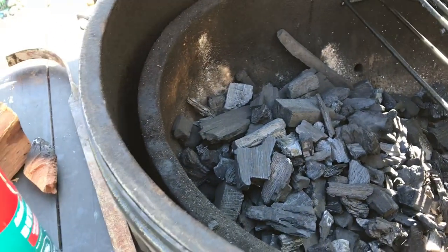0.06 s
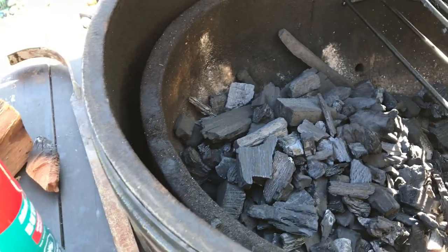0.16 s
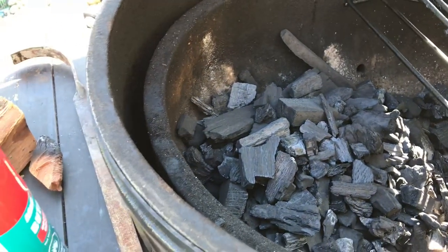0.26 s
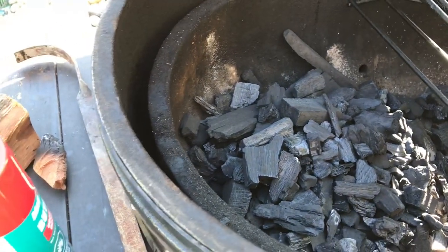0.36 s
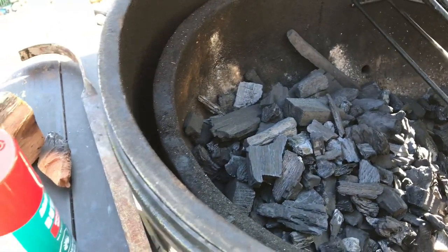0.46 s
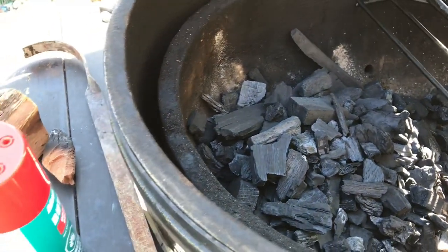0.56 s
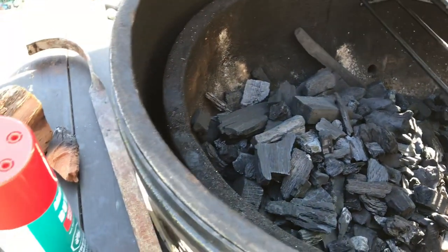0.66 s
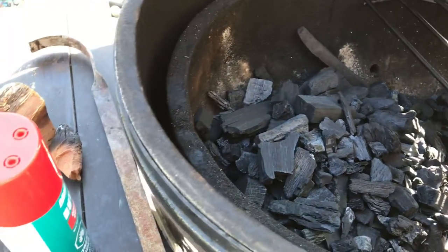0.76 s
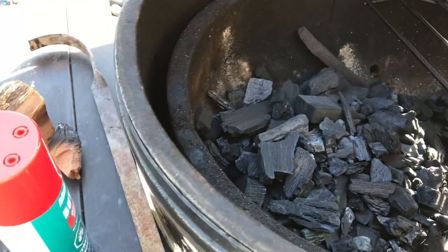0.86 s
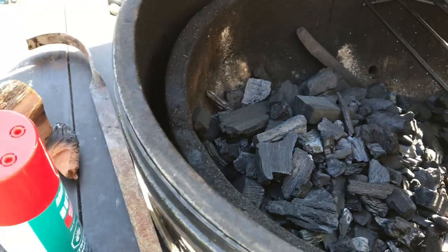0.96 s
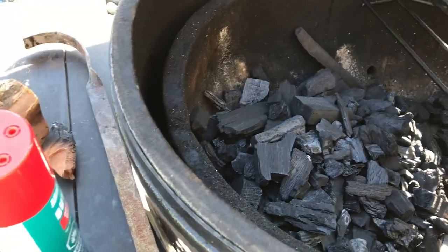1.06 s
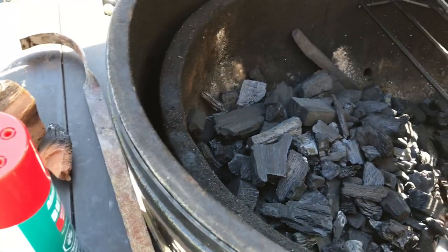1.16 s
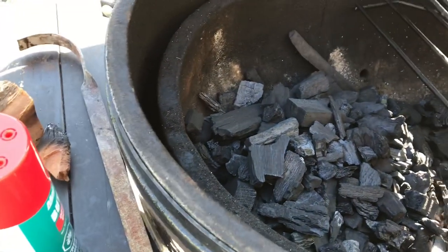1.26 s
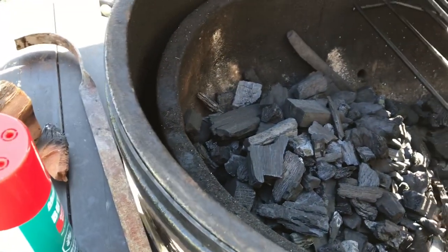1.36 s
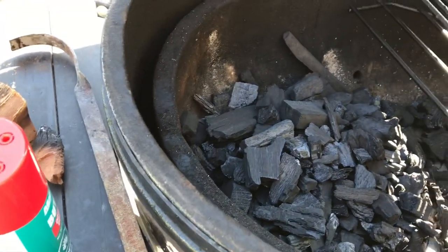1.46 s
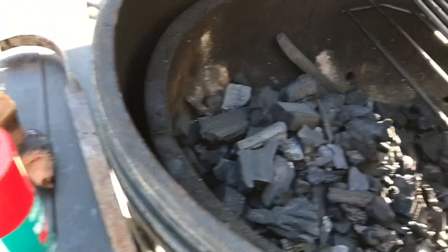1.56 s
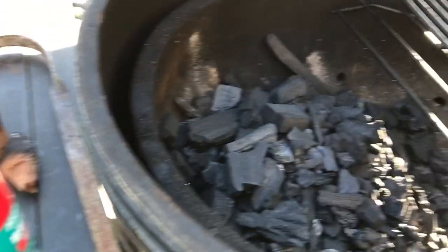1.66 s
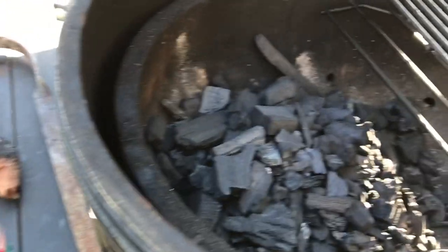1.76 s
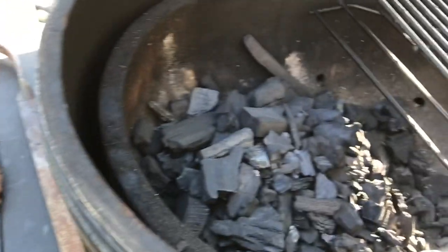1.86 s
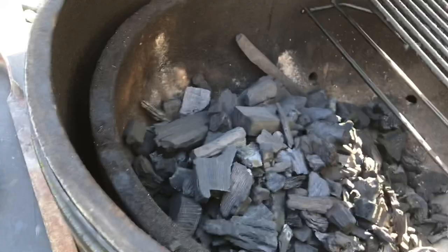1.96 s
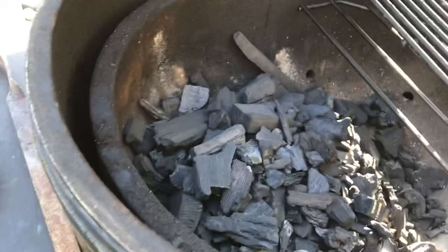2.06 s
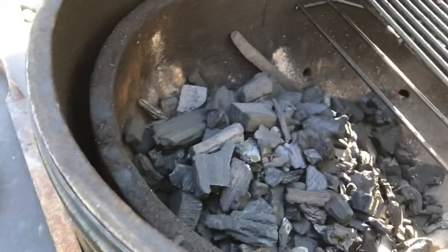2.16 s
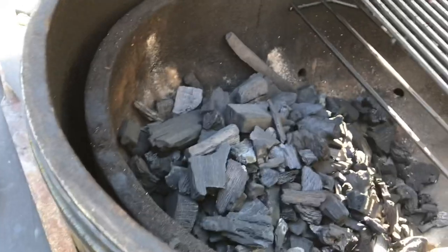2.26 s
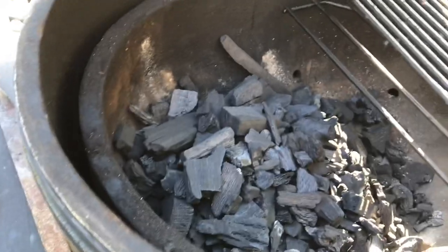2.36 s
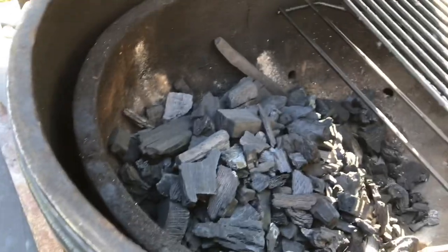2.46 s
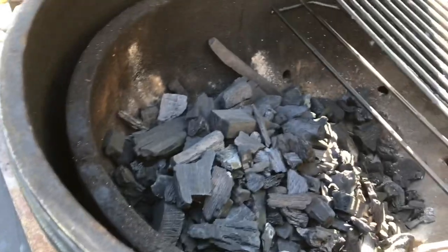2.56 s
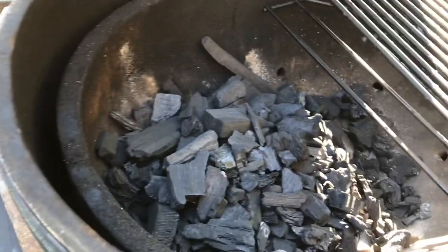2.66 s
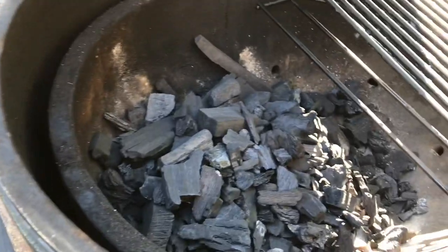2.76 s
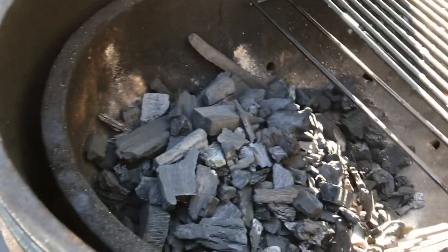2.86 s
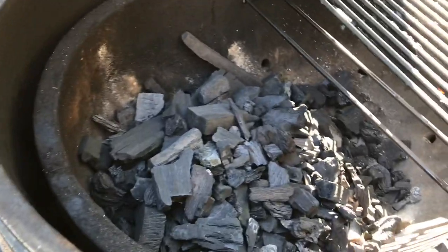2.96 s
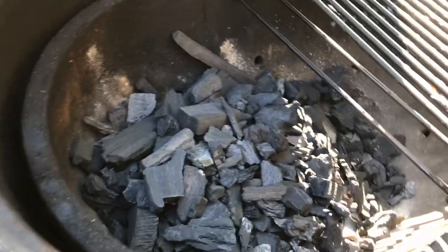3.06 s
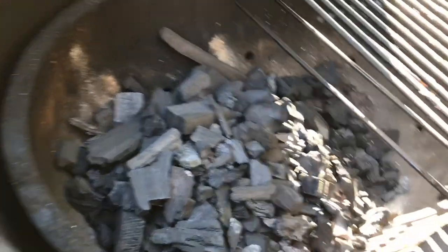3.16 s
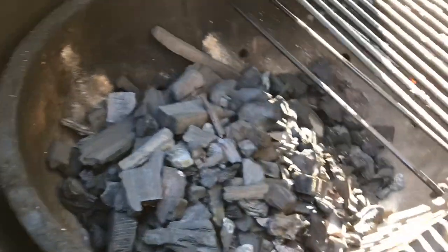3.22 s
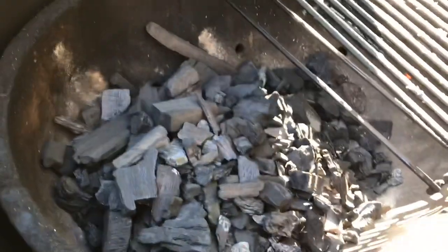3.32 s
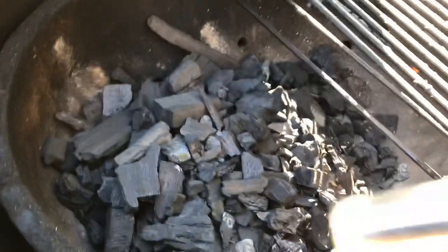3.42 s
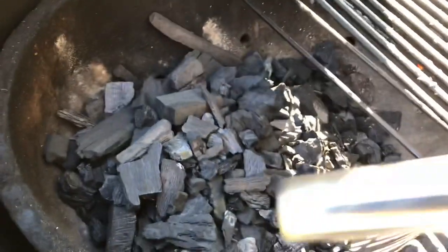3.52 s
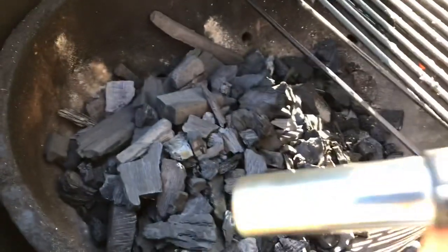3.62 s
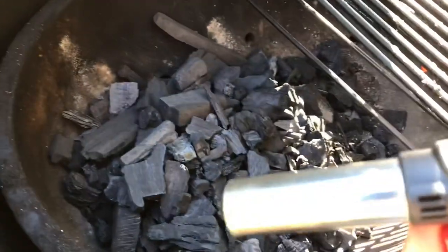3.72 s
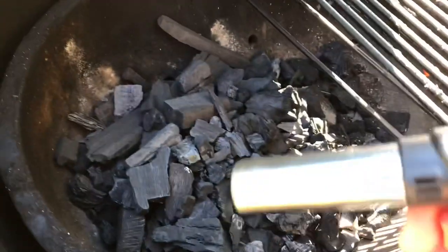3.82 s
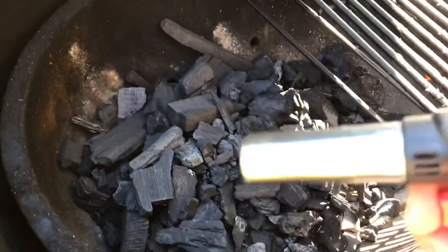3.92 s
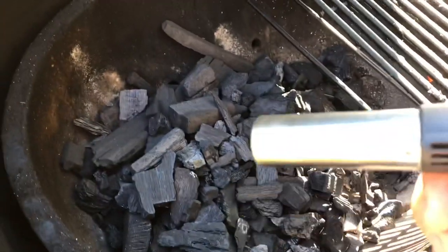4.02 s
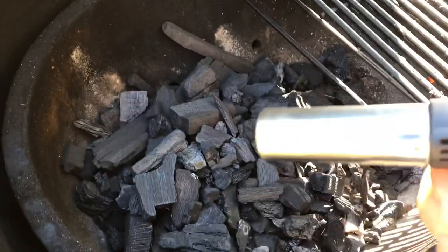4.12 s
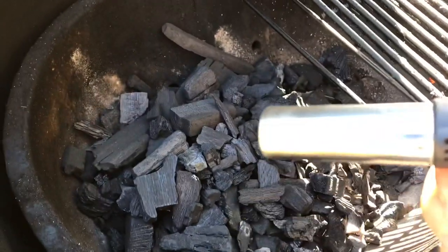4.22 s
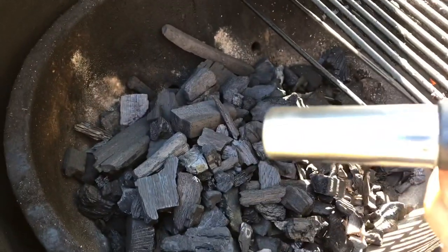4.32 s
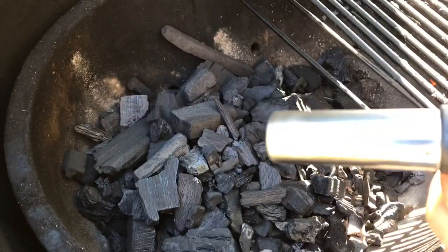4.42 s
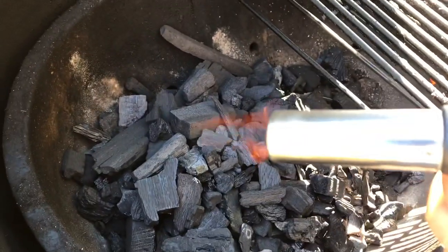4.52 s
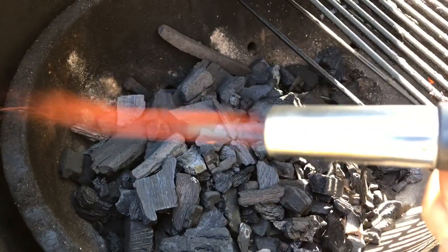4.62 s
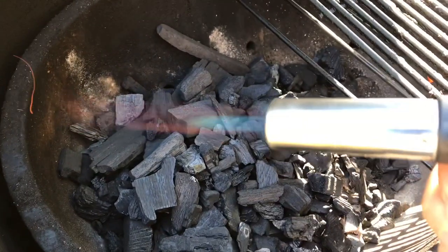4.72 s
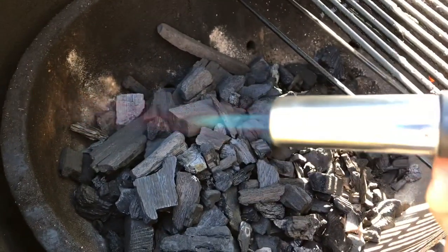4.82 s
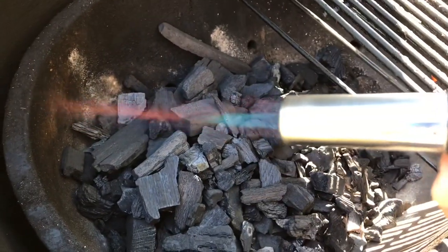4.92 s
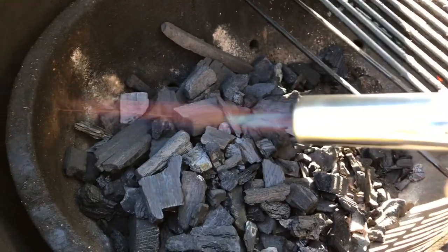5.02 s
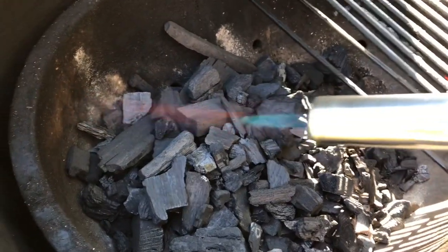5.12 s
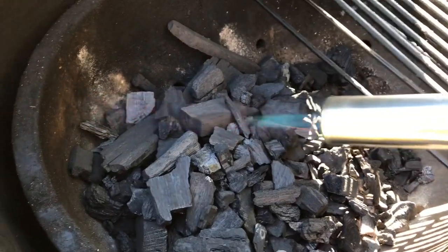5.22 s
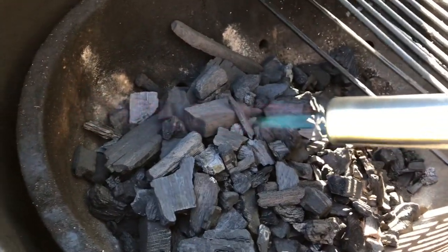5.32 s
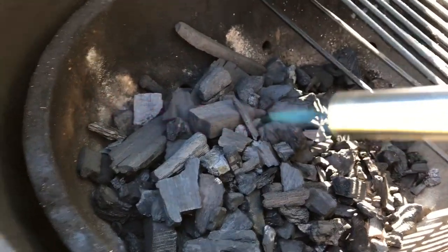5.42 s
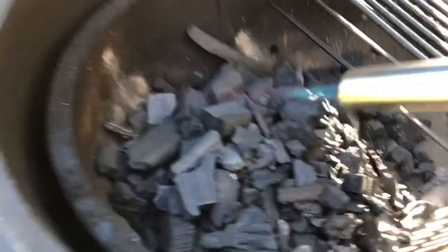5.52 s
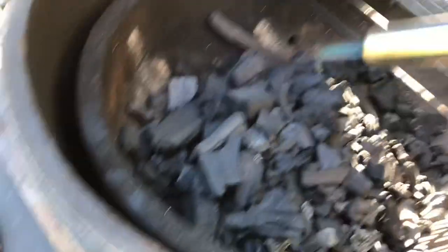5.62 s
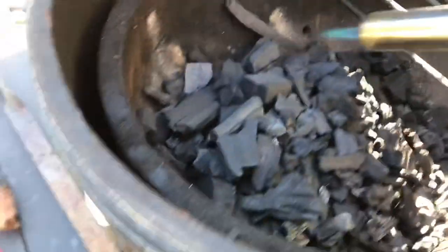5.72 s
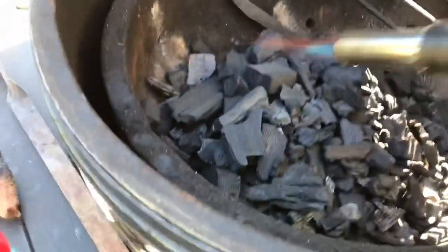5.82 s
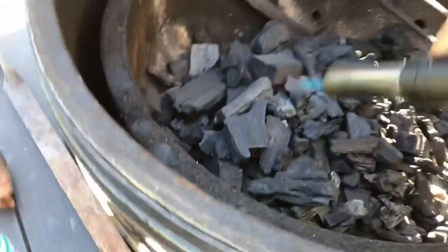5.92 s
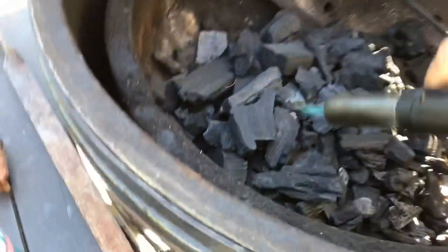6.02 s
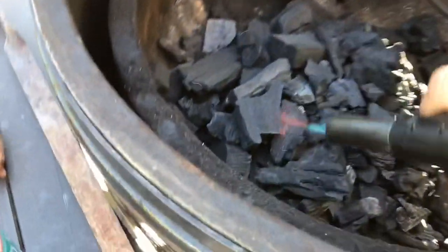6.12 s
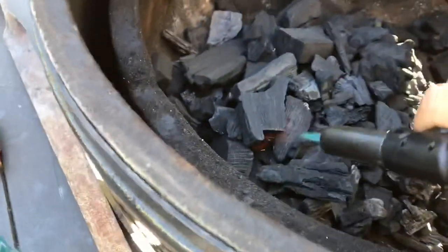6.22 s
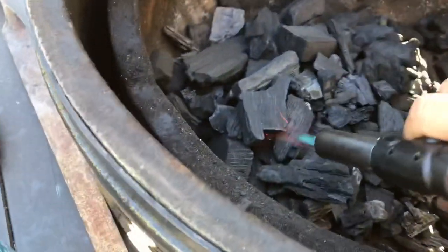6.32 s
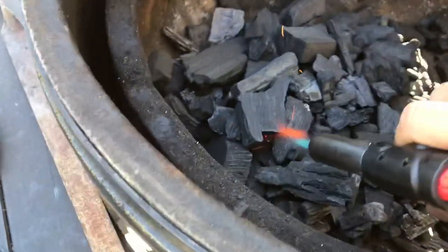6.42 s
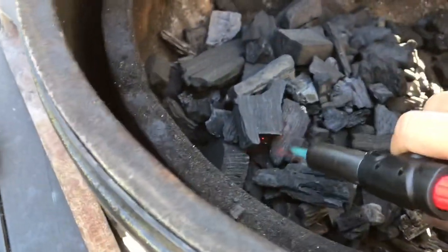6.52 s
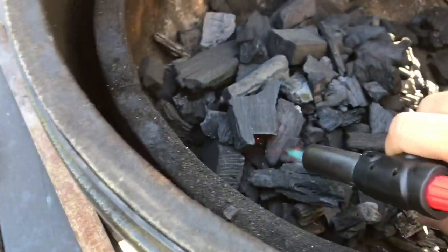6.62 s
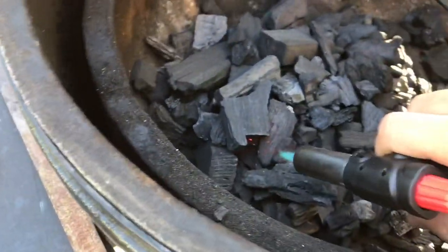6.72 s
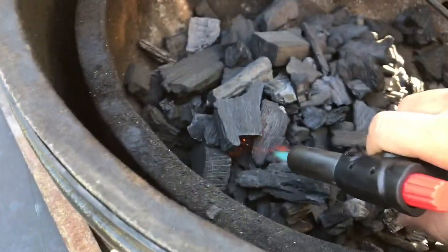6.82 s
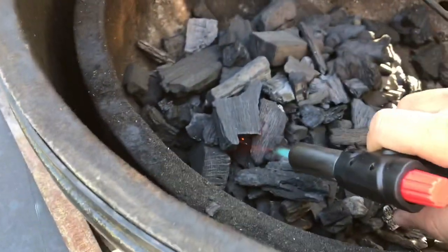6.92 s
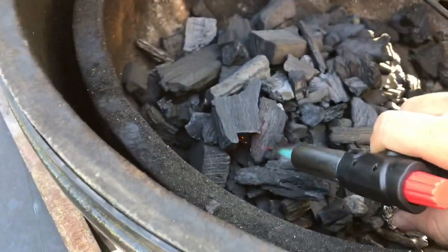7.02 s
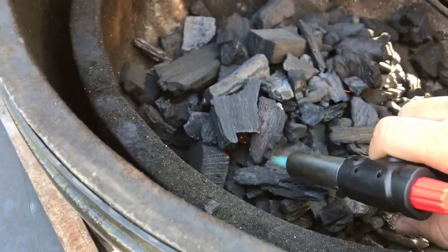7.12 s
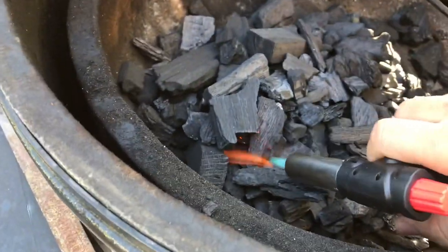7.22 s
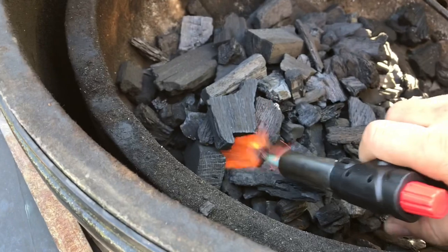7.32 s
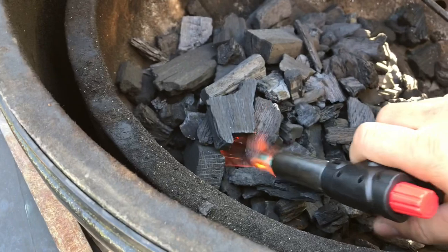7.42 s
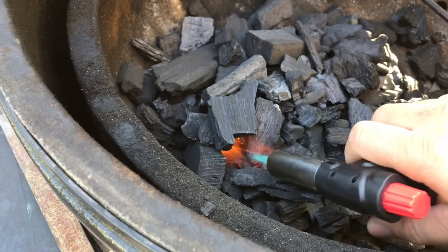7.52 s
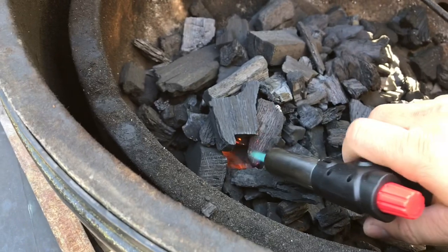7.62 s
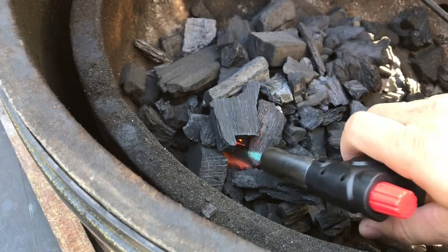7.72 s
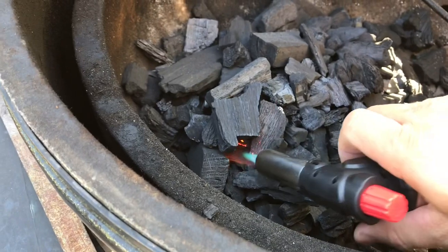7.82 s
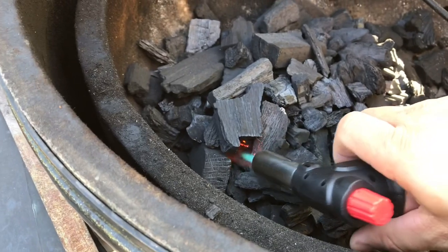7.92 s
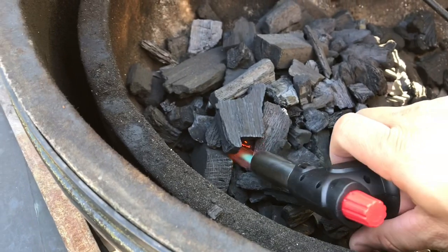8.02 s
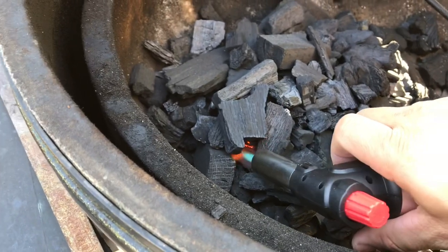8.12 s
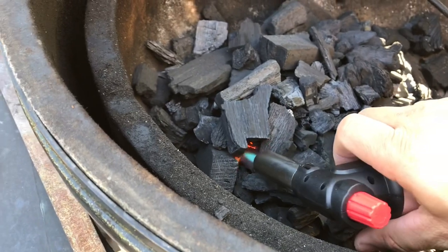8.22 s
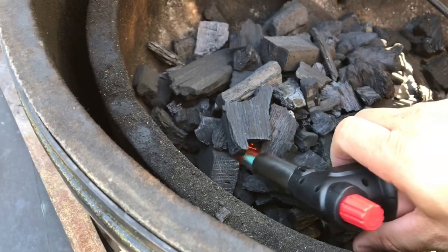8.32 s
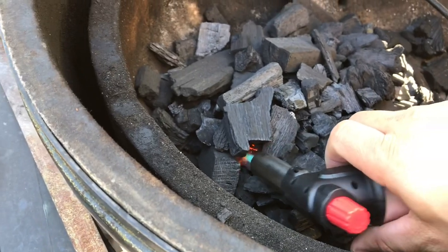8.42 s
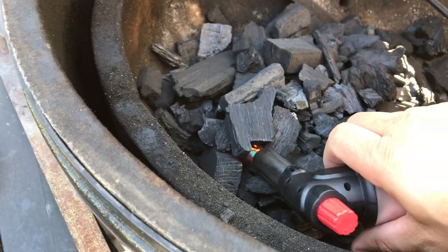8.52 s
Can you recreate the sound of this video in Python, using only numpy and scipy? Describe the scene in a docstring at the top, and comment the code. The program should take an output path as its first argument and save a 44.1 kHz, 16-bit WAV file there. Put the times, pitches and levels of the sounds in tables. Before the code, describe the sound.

A quiet yard with low rumble, miked close. Gas sputters thinly from a torch valve with tiny squeals, and a sharp click cuts through. Then the valve opens into full airy hiss for over a second. A loud snap and low pop light it, and a broad blowtorch roar takes over until the end, brighter at first, then lower and more hollow near the lumps of charcoal, which tick and crackle lightly.

```python
"""A butane flame roars in the bowl of a round outdoor grill, over crackling lump charcoal.
Before it, unlit gas spits and hisses: turbulent noise shaped by tube, valve and bowl resonances.
At lighting the igniter snaps, the gas catches with a falling thump and the flame replaces the cold jet.
The flame is noise with a low roar, an upper roar and a hiss; the bowl's echo shifts as the nozzle sinks.
Snaps, cracks and bumps are short coloured noise bursts, over a low outdoor rumble."""
import sys
import numpy as np
from scipy import signal
from scipy.fft import rfft, irfft
from scipy.io import wavfile
from scipy.ndimage import uniform_filter1d

SR = 44100
rng = np.random.default_rng(int(sys.argv[2]) if len(sys.argv) > 2 else 0)


def put_to_file(sound):
    """Save the sound as 16-bit audio at rate SR, in the file named by the first command-line argument."""
    columns = np.atleast_2d(sound).T  # one column per channel
    safe = np.clip(columns, -1, 1)
    whole_steps = np.round(safe * 32767)
    wavfile.write(sys.argv[1], SR, whole_steps.astype(np.int16))


N = 377937
TIME = np.arange(N) / SR
SOUND_SPEED = 343  # m/s
LIGHT_S = 4.4828
RIPPLE_DB = 2.2  # rms depth of the ripples from scattered echoes

# Course of the burning torch. Each row: time in seconds, then the levels in dB of the low roar,
# the upper roar and the nozzle hiss.
FLAME_COURSE = [(4.55, -33.5, -46.5, -48.5), (4.59, -31, -43.5, -48), (5.07, -31.5, -42.5, -47.5),
                (5.57, -33.5, -45, -51.5), (6.08, -35.5, -50, -49.5), (6.76, -34, -49, -51),
                (7.22, -34.5, -47.5, -50), (8.11, -33.5, -51, -53.5), (8.5, -33.5, -50.5, -54)]
# Roar of the free flame. Each row: frequency in Hz, density in dB per Hz.
FREE_ROAR = [(25, -113), (65, -71), (120, -61), (300, -63), (650, -63.5), (950, -69.5), (1800, -73.5),
             (2700, -76.5), (3600, -82.5), (5000, -79), (7000, -104), (16000, -125)]
# Roar of the flame against the coals. Each row: frequency in Hz, density in dB per Hz.
NEAR_ROAR = [(25, -110), (65, -64.5), (120, -60.5), (250, -59), (450, -63.5), (650, -73.5), (950, -82),
             (1900, -84.5), (3000, -87), (4500, -90), (7000, -106), (16000, -125)]
# Resonances with the flame high over the coals. Each row: centre in Hz, width in Hz, height in dB.
HIGH_RESONANCES = [(195, 15, 6), (293, 65, 5), (490, 99, -9.5), (686, 70, 4.5), (1100, 25, 8),
                   (2500, 210, 2.5), (3950, 120, 4)]
# Peaks and nulls of the air in the grill bowl. Each row: centre in Hz, width in Hz, height in dB.
BOWL_RESONANCES = [(137.5, 31, 6.5), (179, 19, -22), (245, 18, -13), (310.7, 30, 9), (638, 97, -8),
                   (752, 208, 13), (1060, 85, 8.5), (1396, 115, 8.5), (1710, 190, -2.5), (1970, 380, 6.5),
                   (2617, 97, 9.5)]
# Band that swells as the nozzle swings down, and partly stays.
# Each row: centre in Hz, width in Hz, full height in dB.
SWING_RESONANCE = [(2800, 470, 10)]
# Hiss of the hot nozzle. Each row: frequency in Hz, density in dB per Hz.
NOZZLE_HISS = [(2000, -105), (4000, -88.5), (5000, -87), (6200, -83.5), (7200, -89), (8700, -91.5),
               (10000, -104), (11500, -106), (12900, -113), (14200, -109), (16000, -115)]
# Resonances of the hot burner tube. Each row: centre in Hz, width in Hz, height in dB near the coals.
HOT_TUBE_RESONANCES = [(3860, 440, 5.5), (4530, 760, -11.5), (5650, 490, 8.5), (6990, 280, 1.5),
                       (8150, 150, 3)]
# levels in the course at which the spectra above hold (dB)
ROAR_DB, NOZZLE_DB, UPPER_FREE_DB, UPPER_NEAR_DB = -33.5, -48.5, -40, -47.5
SWING_S, SWING_RISE_S, SWING_FADE = 5.66, 0.61, 0.92  # the last is the share that fades again


def flame(roar_echo=0.051, hiss_echo=0.052, free_ring=0.39, split_hz=900, blend_hz=900):
    """Combustion noise and jet noise, filtered by bowl and tube: near the coals it darkens and rings more."""
    def roar(hz, t):
        low_db, upper_db, _ = follow(FLAME_COURSE, t)
        near, path_m = lowering(t)
        upper_share = ease(hz, split_hz, blend_hz)
        low_gain_db = low_db - ROAR_DB
        upper_gain_db = upper_db - (1 - near) * UPPER_FREE_DB - near * UPPER_NEAR_DB
        gain_db = (1 - upper_share) * low_gain_db + upper_share * upper_gain_db
        free = read(FREE_ROAR, hz) + peaks(HIGH_RESONANCES, hz)
        close = read(NEAR_ROAR, hz) + peaks(BOWL_RESONANCES, hz)
        swing_left = 1 - SWING_FADE * ease(t, LOWER_S, LOWER_LENGTH_S)
        swing = ease(t, SWING_S, SWING_RISE_S) * swing_left * peaks(SWING_RESONANCE, hz)
        # the lumps scatter only short waves
        scattered = np.clip(hz / 2500, 0, 1) * scatter(hz, path_m, RIPPLE_DB)
        echoes = echo(hz, path_m, roar_echo) + scattered
        return gain_db + (1 - near) * free + near * close + swing + echoes

    def hiss(hz, t):
        gain_db = follow(FLAME_COURSE, t)[-1] - NOZZLE_DB
        near, path_m = lowering(t)
        ring = (free_ring + (1 - free_ring) * near) * peaks(HOT_TUBE_RESONANCES, hz)
        echoes = echo(hz, path_m, hiss_echo) + scatter(hz, path_m, RIPPLE_DB)
        return gain_db + read(NOZZLE_HISS, hz) + ring + echoes

    roaring = turbulence(roar, size=4096, patchy_db=1.16)
    return roaring + turbulence(hiss, size=2048, patchy_db=2.5)


# the nozzle is lowered once, from high over the coals (nearness 0-1) to right against them
LOWER_S, LOWER_LENGTH_S, HIGH_NEARNESS = 5.92, 0.7, .2
# extra path of the bowl's echo (m), which shrinks as the nozzle comes down
HIGH_PATH_M, LOW_PATH_M, CLOSING_S = .65, .54, 2.3


def lowering(t):
    """Source-to-reflector geometry: the nozzle's nearness to the coals, 0-1, and the extra echo path in m."""
    near = HIGH_NEARNESS + (1 - HIGH_NEARNESS) * ease(t, LOWER_S, LOWER_LENGTH_S)
    path_m = HIGH_PATH_M + (LOW_PATH_M - HIGH_PATH_M) * ease(t, LOWER_S, CLOSING_S)
    return near, path_m


# Colour of the gas jet alone. Each row: frequency in Hz, relative level in dB.
JET_COLOUR = [(900, -37), (1600, -28.5), (2050, -23.5), (3200, -16.5), (4500, -12), (5800, -13),
              (8500, -14), (10000, -26), (13000, -34), (16000, -37)]
# Fixed resonances of the burner tube in cold gas. Each row: centre in Hz, width in Hz, height in dB.
COLD_TUBE = [(2590, 350, 6), (3650, 400, 4), (5950, 250, 4), (7300, 350, 5), (8550, 380, 7),
             (11450, 600, 5), (13900, 1300, 9)]
# Broad bands in which the jet sings. Each row: centre in Hz before the pitch factor,
# width in Hz before it, height in dB at strength 1.
SINGING_BANDS = [(2510, 860, 8.5), (5110, 1120, 14.5)]
# The jet's low rush before flow and trim. Each row: frequency in Hz, density in dB per Hz.
LOW_RUSH = [(40, -105), (122, -56.5), (165, -75), (250, -95), (500, -88), (1500, -121)]
# Air in the bowl humming under the cold jet. Each row: centre in Hz, half-width in Hz, density in dB per Hz.
BOWL_HUM = [(192, 9.4, -68.5), (270, 7, -73), (315, 5.2, -66.5), (344, 7.3, -77), (396, 6.5, -74.5)]
FULL_JET_DB, JET_PATCHY_DB = -72.5, .8
# the jet's bands creep up in pitch as time passes (factor at 0 s, rise of the factor per second)
JET_PITCH, JET_RISE_PER_S = 0.907, 0.024
# the unlit torch swings round to face the bowl: its hiss turns softer, duller and more hollow
AIM_S, AIM_LENGTH_S, AIM_DB, AIM_DB_PER_OCTAVE, AIM_RING = 3.72, 0.36, -2.5, -1.5, 0.16
ASIDE_PATH_M, AIMED_PATH_M = 0.455, 0.98  # the extra echo path grows as the torch is aimed
HUM_S, HUM_RISE_S = 3.9, 0.16  # the jet reaches into the bowl and sets its air humming


def gas(rush_db=-2):
    """Turbulent jet noise: unlit gas hisses through a resonant tube and, aimed at the bowl, stirs its air."""
    def hiss(hz, t):
        flow_db, bright, ring = valve(t)
        aimed = ease(t, AIM_S, AIM_LENGTH_S)
        octaves = np.log2(np.clip(hz, 2600, 9000) / 5000)
        tilt = (bright + aimed * AIM_DB_PER_OCTAVE) * octaves
        pitch = JET_PITCH + JET_RISE_PER_S * t
        singing = (ring + aimed * AIM_RING) * peaks(SINGING_BANDS, hz / pitch)
        colour = read(JET_COLOUR, hz) + peaks(COLD_TUBE, hz) + singing + tilt
        path_m = ASIDE_PATH_M + aimed * (AIMED_PATH_M - ASIDE_PATH_M)
        return FULL_JET_DB + flow_db + aimed * AIM_DB + colour + scatter(hz, path_m, RIPPLE_DB)

    def stirred_air(hz, t):
        aim_db = ease(t, AIM_S, AIM_LENGTH_S) * AIM_DB
        rush = amp(rush_db + valve(t)[0] + aim_db + read(LOW_RUSH, hz))
        modes = sum(amp(db + band(hz, f, width)) for f, width, db in BOWL_HUM)
        hum = ease(t, HUM_S, HUM_RISE_S) * modes
        return 20 * np.log10(np.hypot(rush, hum))

    hissing = turbulence(hiss, size=1024, patchy_db=JET_PATCHY_DB)
    return hissing + turbulence(stirred_air, size=4096, patchy_db=0.5)


# Turns of the gas valve. Each row: time in seconds, new flow in dB relative to full,
# brightness in dB per octave, strength of the jet's bands as a factor.
VALVE_TURNS = [(.7, -13, -3, 0.77), (1.5, -11, -2, 0.5), (2.22, -12, -1, .85), (2.4, -10, -1, 0.41),
               (2.75, -2, -3.1, 0.32), (3.25, -1, -2.9, 0.81)]
TURN_S, SHUT_DB, CHOKE_S = 0.12, -39, 0.054


def valve(t):
    """Flow control: each turn sets flow dB, brightness and band strength anew; spurts choke the flow."""
    state = [SHUT_DB, *VALVE_TURNS[0][2:]]
    for s, *setting in VALVE_TURNS:
        turned = ease(t, s, TURN_S)
        state = [old + (new - old) * turned for old, new in zip(state, setting)]
    choke_db = sum(db * spurting(t, s, length_s, CHOKE_S, CHOKE_S) for s, length_s, *_, db in VALVE_SPURTS)
    return state[0] + choke_db, state[1], state[2]


# Spurts of the half-open valve. Each row: start in seconds, length in seconds, attack in seconds,
# settled level in dB per Hz before colour and bands, settled pitch factor, change of the steady flow in dB.
VALVE_SPURTS = [(0.134, 0.61, .012, -108.5, 0.99, -3.5), (0.298, 0.022, .02, -110, 0.9, 0),
                (1.904, 0.154, .012, -103.5, 1.055, -11), (2.075, 0.15, 0.031, -102, 1.024, -6),
                (2.384, 0.11, .012, -105, 1.4, -1), (2.493, .24, 0.056, -101.5, 1.007, -6.5),
                (2.94, 0.11, .03, -105, 1.2, -2.5), (3.166, 0.074, .03, -102, 1.04, -4)]
# Broad colour of the spitting. Each row: frequency in Hz, relative level in dB.
SPITTING_COLOUR = [(1200, -11), (3000, -3.5), (6000, -0.5), (9000, -4.5), (11500, -4.5), (16000, -9)]
# Whistling bands of the spitting. Each row: centre in Hz and width in Hz before the pitch factor, height in dB.
WHISTLE_BANDS = [(3240, 530, 16), (5620, 640, 14), (9150, 740, 9.5), (13600, 1000, 6)]
# Short squeals of the valve. Each row: middle in seconds, length in seconds, start in Hz, end in Hz,
# peak density in dB per Hz.
VALVE_SQUEALS = [(2.094, 0.036, 9800, 9400, -80), (2.13, .14, 10900, 10600, -95),
                 (2.64, .16, 15600, 15400, -95)]
# each spurt starts loud and high, then settles
SURGE_DB, SURGE_S, SHARP_SHARE, SINK_S, SPURT_RELEASE_S = 7.5, 0.038, 0.17, 0.055, 0.038


def spitting(squeal_width_hz=170):
    """Flow noise of a narrow gap: thin hiss whose bands sink after each spurt, with brief squeals."""
    def hiss(hz, t):
        total = 1e-9
        for s, length_s, attack_s, db, settled_pitch, _ in VALVE_SPURTS:
            age = np.maximum(t - s, 0)
            pitch = settled_pitch * (1 + SHARP_SHARE * np.exp(-age / SINK_S))
            bands = peaks(WHISTLE_BANDS, hz / pitch)
            surge_db = SURGE_DB * np.exp(-age / SURGE_S)
            envelope = spurting(t, s, length_s, attack_s, SPURT_RELEASE_S)
            total = total + envelope * amp(db + surge_db + bands)
        return 20 * np.log10(total) + read(SPITTING_COLOUR, hz)

    def squeal(hz, t):
        total = 1e-9
        for s, length_s, start_hz, end_hz, db in VALVE_SQUEALS:
            u = np.clip((t - s) / length_s, -2, 2)
            centre = (start_hz + end_hz) / 2 + u * (end_hz - start_hz)
            total = total + amp(db + band(hz, centre, squeal_width_hz)) * np.exp(-(2 * u) ** 2)
        return 20 * np.log10(total)

    return turbulence(hiss, size=512, patchy_db=2.5) + turbulence(squeal, size=512, patchy_db=1.5)


def spurting(t, s, length_s, attack_s, release_s):
    """Envelope of a transient flow, 0-1: attack, hold and release of one spurt."""
    return ease(t, s, attack_s) * (1 - ease(t, s + length_s, release_s))


def ignition(thump_db=-14.0, start_hz=172, end_hz=92, sag_s=0.0083, swell_s=.0048,
             ping_hz=11080, ping_db=-42, ping_t60=0.11,
             puff_db=-25, puff_hz=250, puff_width_hz=130, puff_s=0.0079):
    """Sudden combustion: the gas in the tube catches with a puff and falling thump; the igniter spring pings."""
    t, out = np.arange(SR // 4) / SR, np.zeros(N)
    hz = end_hz + (start_hz - end_hz) * np.exp(-t / sag_s)
    thump_envelope = t / swell_s * np.exp(1 - t / swell_s)
    thump = thump_envelope * -np.cos(2 * np.pi * np.cumsum(hz) / SR)
    ping = np.exp(-np.log(1000) * t / ping_t60) * np.sin(2 * np.pi * ping_hz * t)
    puff = burst(lambda f: band(f, puff_hz, puff_width_hz), t / puff_s * np.exp(1 - t / puff_s))
    add(out, LIGHT_S, amp(thump_db) * thump + amp(puff_db) * puff + amp(ping_db) * ping)
    return out


# Snaps of the trigger and its lock. Each row: start in seconds, level in dB, brightness in dB per octave,
# decay time constant in seconds, strongest ring in Hz, its height in dB, height of the hollow knock in dB.
SNAPS = [(0.698, -44, -5, 0.0028, 3240, 15, 8), (1.2761, -10.5, 2.1, 0.0022, 1690, 6.5, 17.5),
         (1.4958, -27.5, -2.5, 0.0034, 1820, 8, 6), (2.042, -48, 1.5, 0.0052, 13000, 18, 10),
         (4.4770, -5, 2, 0.002, 4630, 4.5, 14), (4.7312, -20, -4.5, 0.0017, 5360, 8, 13)]
# Colour of the torch body. Each row: frequency in Hz, relative level in dB.
BODY_COLOUR = [(200, -16), (600, -20), (1000, -13), (2400, -1), (3100, -4.5), (4400, 1.5), (5800, -2.5),
               (6700, -3), (8400, -8), (9300, -14.5), (12000, -14), (16000, -21)]
# Modes of the torch body. Each row: centre in Hz, width in Hz, height in dB.
BODY_RINGS = [(8160, 380, 14)]
RING_SHARE = .22  # width of the strongest ring as a share of its frequency
KNOCK_HZ, KNOCK_WIDTH_HZ = 650, 220


def clicks(rise_s=0.00097, tail_db=-16, tail_s=0.01, tail_tilt_db=-3):
    """Impact excitation of modes: each snap rattles the torch body; the grill scatters a duller tail."""
    t, out = np.arange(SR // 8) / SR, np.zeros(N)
    for s, db, bright, decay_s, ring_hz, ring_db, knock_db in SNAPS:
        ring = (ring_hz, RING_SHARE * ring_hz, ring_db)
        knock = (KNOCK_HZ, KNOCK_WIDTH_HZ, knock_db)
        modes = [*BODY_RINGS, ring, knock]

        def colour(hz, tilt=0):
            octaves = np.log2(np.maximum(hz, 1500) / 4000)
            return read(BODY_COLOUR, hz) + peaks(modes, hz) + (bright + tilt) * octaves

        snap = burst(colour, 2 * (1 - np.exp(-t / rise_s)) * np.exp(-t / decay_s))
        tail_envelope = (1 - np.exp(-t / decay_s)) * np.exp(-t / tail_s)
        tail = burst(lambda hz: colour(hz, tail_tilt_db), tail_envelope)
        add(out, s, amp(db) * (snap + amp(tail_db) * tail))
    return out


# Charcoal splitting in the heat. Each row: start in seconds, level in dB, length scale in seconds,
# brightness in dB per octave.
SPLITS = [(5.5224, -49, .003, 0), (7.2653, -33, 0.0068, 0), (7.389, -37.5, 0.0043, 1),
          (7.424, -31.5, 0.0045, 1.5), (7.901, -43, 0.0027, -3), (8.1619, -47, .003, -2),
          (8.2492, -47, .003, -3), (8.536, -36.5, 0.0041, -2)]
# Colour of a crack. Each row: frequency in Hz, relative level in dB.
SPLIT_COLOUR = [(500, -4), (2000, -2), (4500, 0), (7500, -8.5), (11000, -9), (16000, -7.5)]


def charcoal(clump_db=3):
    """Brittle fracture: each crack is a brief uneven run of tiny fractures."""
    t, out = np.arange(SR // 16) / SR, np.zeros(N)
    for s, db, length_s, bright in SPLITS:
        clumps = uniform_filter1d(rng.standard_normal(len(t)), size=40)
        unevenness = amp(clump_db * clumps / clumps.std())
        envelope = unevenness * np.exp(-(t / (2 * length_s)) ** 2)
        envelope *= np.sqrt(length_s * SR) / np.linalg.norm(envelope)  # energy set by level and length
        crack = burst(lambda hz: read(SPLIT_COLOUR, hz) + bright * np.log2(np.maximum(hz, 2000)), envelope)
        add(out, s, amp(db) * crack)
    return out


# Soft handling bumps. Each row: start in seconds, level in dB, pitch in Hz, time to the peak in seconds.
HAND_BUMPS = [(2.906, -41, 178, 0.0073), (2.923, -51, 630, 0.007), (2.985, -56.5, 726, 0.017),
              (3.651, -36, 253, 0.0035)]


def handling(steep_db=22):
    """Soft impacts: dull, narrow-band bumps of the hand on the torch."""
    t, out = np.arange(SR // 4) / SR, np.zeros(N)
    for s, db, pitch_hz, peak_s in HAND_BUMPS:
        envelope = t / peak_s * np.exp(1 - t / peak_s)
        bump = burst(lambda hz: -steep_db * np.log2((hz + 1) / pitch_hz) ** 2, envelope)
        add(out, s, amp(db) * bump)
    return out


# Outdoor background. Each row: frequency in Hz, density in dB per Hz.
YARD_RUMBLE = [(20, -102), (45, -97.5), (70, -64), (112, -66.5), (160, -81.5), (220, -83.5), (330, -83.5),
               (440, -94), (700, -92.5), (1000, -100), (2200, -106), (5800, -109), (7000, -117),
               (16000, -122)]


def yard():
    """Stationary ambient noise: a low outdoor rumble, steady in level."""
    return turbulence(lambda hz, t: read(YARD_RUMBLE, hz), size=2048, patchy_db=1.3)


def turbulence(colour, size, patchy_db):
    """Time-varying filtering: noise of density colour(Hz, s) in dB per Hz, with small drifting patches."""
    grid = dict(fs=SR, nperseg=size, noverlap=size - size // 4)
    hz, t, z = signal.stft(rng.standard_normal(N) * np.sqrt(SR / 2), **grid)
    patches = uniform_filter1d(rng.standard_normal(z.shape), size=12, axis=0)
    patches = uniform_filter1d(patches, size=6, axis=1)
    gain_db = colour(hz[:, None], t) + patchy_db * patches / patches.std()
    return signal.istft(z * amp(gain_db), **grid)[1][:N]


def burst(colour, envelope):
    """Random-phase synthesis: a short coloured rattle under an envelope, which also sets its rms."""
    hz = np.fft.rfftfreq(len(envelope), 1 / SR)
    spectrum = amp(colour(hz)) * np.exp(2j * np.pi * rng.random(len(hz)))
    sound = envelope * irfft(spectrum, len(envelope))
    return sound * np.linalg.norm(envelope) / np.linalg.norm(sound)


def echo(hz, path_m, share):
    """Interference: the comb in dB that one reflection lays over a sound."""
    turns = hz * path_m / SOUND_SPEED
    return 20 * np.log10(abs(1 + np.clip(share, 0, .9) * np.exp(2j * np.pi * turns)))


def scatter(hz, path_m, ripple_db, count=10):
    """Multiple scattering: weak echoes off lumps and far wall ripple the spectrum, sliding with the path."""
    extra_m = rng.uniform(.1, 1.8, count)
    turns_per_m = hz / SOUND_SPEED
    still = sum(rng.choice([-1, 1]) * np.exp(2j * np.pi * turns_per_m * m) for m in extra_m)
    moved = still * np.exp(2j * np.pi * turns_per_m * path_m)
    return ripple_db * np.sqrt(2 / count) * moved.real


def peaks(bands, hz):
    """Resonance: bell-shaped peaks in dB, each half its height at half its width from the centre."""
    return sum(db * .5 ** ((2 * (hz - f) / width) ** 2) for f, width, db in bands)


def band(hz, centre, half_width):
    """Resonance skirts in dB: 0 at the top, 6 dB down at the half-width."""
    return -20 * np.log10(1 + ((hz - centre) / half_width) ** 2)


def read(points, hz):
    """Spectral interpolation: dB values joined by straight lines over log frequency."""
    f, db = np.transpose(points)
    return np.interp(np.log(hz + 1), np.log(f + 1), db)


def follow(rows, t):
    """Linear interpolation: the columns of a control curve at times t."""
    s, *columns = np.transpose(rows)
    return [np.interp(t, s, c) for c in columns]


def ease(t, middle, length):
    """Raised-sine transition: a smooth move from 0 to 1."""
    return .5 + .5 * np.sin(np.pi * np.clip((t - middle) / length, -.5, .5))


def amp(db):
    """Logarithmic level: decibels to gain."""
    return 10 ** (np.asarray(db) / 20)


def add(mix, s, sound):
    """Superposition: lays a sound into the mix at time s."""
    part = mix[round(s * SR):][:len(sound)]
    part += sound[:len(part)]


def scene(catch_s=0.0058):
    """Superposition of sources: the flame takes over from the cold gas at the moment of lighting."""
    lit = np.clip((TIME - LIGHT_S) / catch_s, 0, 1)
    torch = lit * flame() + (1 - lit) * (gas() + spitting()) + ignition() + clicks()
    return (torch + charcoal() + handling() + yard())[None]


def record(dry, dip_db=-7, edge_hz=15900):
    """Transducer response: the microphone's sharp treble dip, then full scale and the band limit."""
    hz = np.fft.rfftfreq(N, 1 / SR)
    response_db = read([(6020, 0.015), (6190, dip_db), (7200, 0)], hz)
    coloured = irfft(rfft(dry) * amp(response_db), N)
    low_pass = signal.firwin(511, edge_hz, window=("kaiser", 9), fs=SR)
    return signal.oaconvolve(np.clip(coloured, -1, 1), low_pass[None], "same")


dry = scene()
out = record(dry)
put_to_file(out)
```